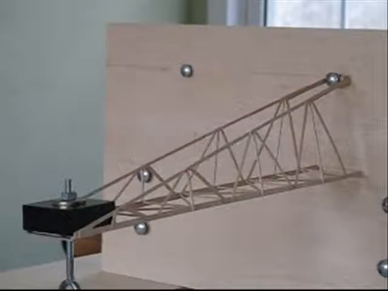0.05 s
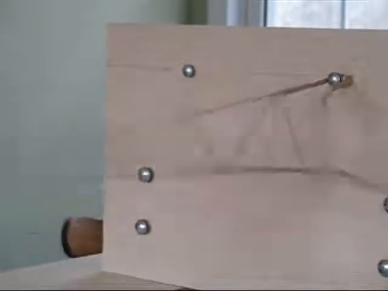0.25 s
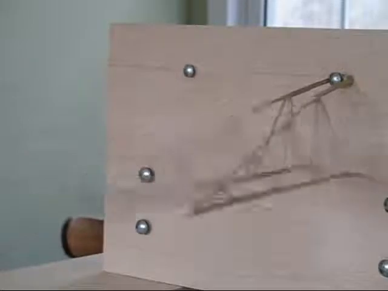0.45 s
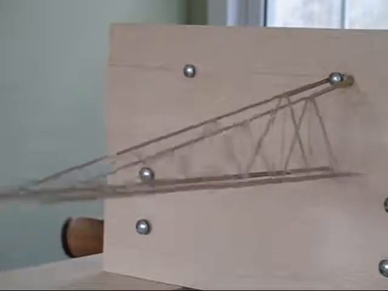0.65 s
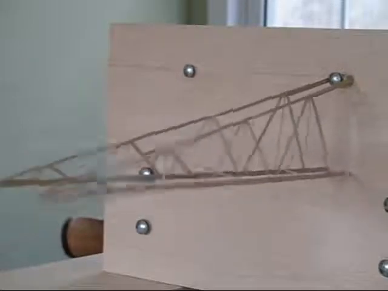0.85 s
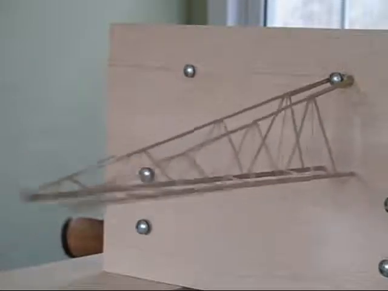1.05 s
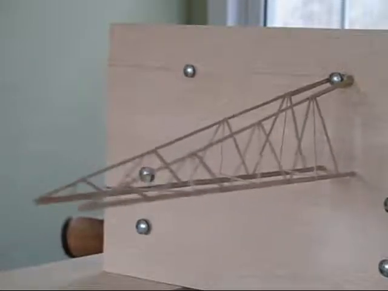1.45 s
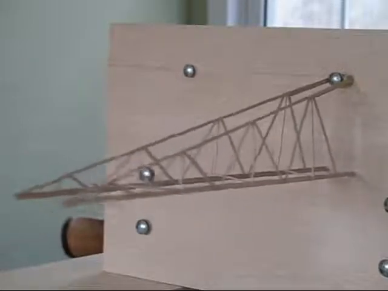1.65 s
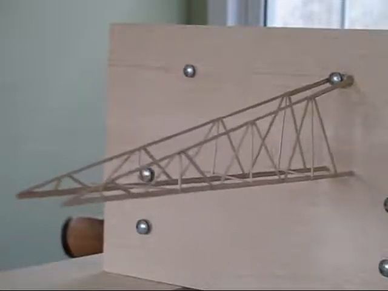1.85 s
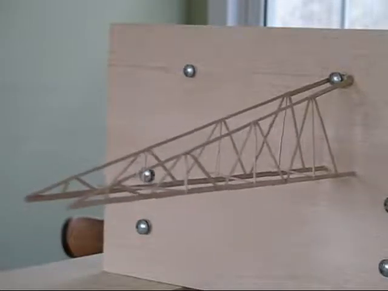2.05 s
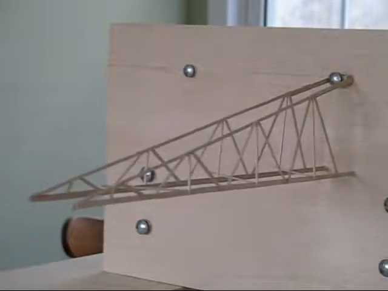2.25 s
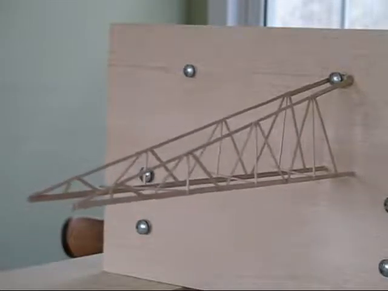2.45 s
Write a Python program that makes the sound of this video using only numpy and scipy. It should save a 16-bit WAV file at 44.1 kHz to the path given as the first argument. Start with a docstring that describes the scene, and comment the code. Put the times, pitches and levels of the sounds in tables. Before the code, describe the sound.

Dry wooden cracks and a crash, then loose sticks rattling and knocking ever more sparsely.

```python
"""A burst of dry wooden cracks: a model truss of thin sticks snaps under its load. The weight crashes down,
the table shudders and the long beam twangs. Sticks scrape, and the loose frame swings and clatters
against its backboard in ever sparser knocks, in a small room. Each hit is a chatter of tiny contacts
that rings the wood. A cheap low-rate recorder adds hiss, hum, a thin whine and a gritty mirrored treble."""
import sys
import numpy as np
from scipy import signal
from scipy.fft import rfft, irfft
from scipy.io import wavfile

SR = 44100
rng = np.random.default_rng(int(sys.argv[2]) if len(sys.argv) > 2 else 0)


def dump(signal):
    """Clip the signal to [-1, 1] and save it as 16-bit WAV at the path in sys.argv[1]."""
    limited = np.clip(np.atleast_2d(signal).T, -1, 1)
    pcm = np.round(limited * 32767).astype(np.int16)
    wavfile.write(sys.argv[1], SR, pcm)


N = 114660
BURST_GAIN = np.sqrt(.01 * SR)  # gives a unit-energy burst the energy of 10 ms at 0 dB


def undb(db):
    """Decibels to gain."""
    return 10 ** (np.asarray(db) / 20)


def unit(x):
    """Scale to an energy of one."""
    return x / np.sqrt(np.sum(x ** 2) + 1e-18)


def fade(t, t60):
    """Exponential decay, 60 dB down after t60."""
    return np.exp(-np.log(1000) * t / t60)


def band(x, edges_hz, order=2):
    """Causal band-pass."""
    return signal.sosfilt(signal.butter(order, edges_hz, "band", fs=SR, output="sos"), x)


def eq(x, points):
    """Shape the tone with a curve through (f/Hz, gain/dB) points."""
    hz, db = np.array(points, float).T
    f = np.maximum(np.fft.rfftfreq(2 * N, 1 / SR), 1)
    gain = undb(np.interp(np.log(f), np.log(hz), db))
    return irfft(rfft(x, 2 * N) * gain)[:N]


def add(out, start_s, x):
    """Mix a sound in at a time."""
    i = int(start_s * SR)
    out[i:i + len(x)] += x[:N - i]


def chatter(t, decay_s, count=120, gap_s=.0006, size=.71, scatter_db=2.5):
    """One sharp contact, then a dying rattle of rebounds at uneven gaps."""
    delays = np.cumsum(gap_s * (.5 + .5 * rng.exponential(size=count)))
    sizes = size * rng.choice([-1, 1], count) * undb(scatter_db * rng.standard_normal(count))
    samples = np.minimum(delays * SR, len(t) - 1).astype(int)
    force = np.zeros(len(t))
    force[0] = 1
    np.add.at(force, samples, sizes * np.exp(-delays / decay_s))
    return force


# Resonances of frame and board: f/Hz, level/dB, t60/s
WOOD_MODES = [(384.6, -8.5, 0.139), (725, -25.5, 0.082), (853.3, -5, 0.099), (934, -14.5, 0.142),
              (1151.8, -3, 0.133), (1211.6, -8, 0.175), (1268, -12.5, 0.168), (1555.7, 3, 0.111),
              (1660, -12.5, 0.081), (1758.7, -16, 0.344)]

def wood_ring(t, detune=.015):
    """The wood's ring after one contact; every blow lands elsewhere and detunes the modes a little."""
    hz, db, t60 = np.array(WOOD_MODES).T[:, :, None]
    tuning = 1 + detune * rng.standard_normal((len(hz), 1))
    rings = fade(t, t60) * np.cos(2 * np.pi * hz * tuning * t)
    return np.sum(undb(db) * rings / np.linalg.norm(rings, axis=1, keepdims=True), axis=0)


# Wood hits: t/s, thud level/dB, knock level/dB, snap level/dB, knock centre f/Hz, chatter decay/s
WOOD_HITS = [ (0.215, -47.5, -48, -46.5, 1090, 0.0076), (0.227, -37, -45.5, -27.5, 1100, 0.021),
             (0.2363, -22, -28.5, -16, 1345, 0.0082), (0.2461, -22.5, -21, -24.5, 879, 0.0045),
             (0.2620, -30.5, -23.5, -21, 1135, 0.0206), (0.2742, -24.5, -21.5, -31.5, 1227, 0.03),
             (0.287, -25, -19.5, -26.5, 1360, 0.0148), (0.3170, -25, -24, -27.5, 1580, 0.0126),
             (0.325, -28.5, -23.5, -22, 1280, 0.039), (0.3440, -22, -19.5, -25, 1290, 0.0053),
             (0.3610, -22.5, -22.5, -24, 1342, 0.0193), (0.3890, -30.5, -21, -24.5, 1376, 0.063),
             (0.4190, -33.5, -30, -32.5, 1345, 0.025), (0.4370, -35.5, -30, -26.5, 1260, 0.0108),
             (0.4680, -38, -29.5, -26.5, 1400, 0.018), (0.4879, -29.5, -46.5, -16.5, 1470, 0.00284),
             (0.4894, -28.5, -17.5, -17.5, 1257, 0.00544), (0.5080, -31.5, -19.5, -25.5, 1340, 0.0098),
             (0.5200, -40, -20, -23.5, 1460, 0.014), (0.5490, -36, -26, -28, 1400, 0.026),
             (0.5940, -26.5, -27, -26, 1278, 0.0148), (0.6150, -31.5, -27.5, -32, 1230, 0.0037),
             (0.641, -36, -29, -29, 1366, 0.062), (0.696, -32.5, -25, -31, 1690, 0.036),
             (0.735, -28.5, -29, -36, 1150, 0.0091), (0.7600, -33, -31, -31, 1186, 0.0139),
             (0.7900, -32, -28.5, -31, 1277, 0.0097), (0.8250, -41.5, -31.5, -33.5, 1310, 0.088),
             (0.8570, -30, -24.5, -28, 1267, 0.0192), (0.8765, -30.5, -22, -27.5, 1646, 0.0079),
             (0.8890, -52, -29, -41.5, 1436, 0.0104), (0.927, -32, -25.5, -26, 1213, 0.008),
             (0.9420, -36.5, -27.5, -32.5, 1204, 0.0036), (0.9737, -24, -14, -23.5, 1006, 0.007),
             (0.992, -29, -23, -28, 1278, 0.0037), (1.0220, -38.5, -55, -33.5, 1130, 0.0035),
             (1.0426, -30.5, -28.5, -27, 1550, 0.018), (1.0820, -36.5, -32, -34, 1225, 0.043),
             (1.1253, -38, -35.5, -34.5, 1246, 0.0057), (1.1614, -32, -38, -32.5, 1197, 0.0066),
             (1.194, -33.5, -27.5, -27, 1088, 0.0042), (1.2100, -49.5, -32.5, -27, 1320, 0.0047),
             (1.2583, -39.5, -24, -25, 1240, 0.0048), (1.2670, -41, -23.5, -34, 1296, 0.0111),
             (1.369, -37.5, -34, -43, 1136, 0.0081), (1.4656, -49, -28.5, -34, 1149, 0.00037),
             (1.6266, -49, -24, -33, 1190, 0.00025), (1.6625, -32.5, -21, -24.5, 1219, 0.012),
             (1.6760, -30.5, -27.5, -27.5, 1256, 0.005), (1.7275, -28.5, -24.5, -28, 1200, 0.00223),
             (1.7405, -51, -29, -35, 1565, 0.0046), (2.035, -37.5, -27.5, -42.5, 1206, 0.0012),
             (2.1182, -39, -30.5, -35, 1105, 0.0016), (2.1270, -52.5, -31, -39.5, 1250, 0.00256),
             (2.1510, -46.5, -32, -35, 1100, 0.0035), (2.1560, -31, -27, -43, 1070, 0.0023),
             (2.1615, -29.5, -31.5, -20.5, 1050, 0.0057), (2.1641, -25, -22, -21, 1086, 0.00192),
             (2.1950, -50, -25.5, -52, 1323, 0.0056), ]

def cracks_and_knocks(spots=3, knock_spread=1.6375, ring_db=-13):
    """Each chatter layers a low thud, a mid knock and a bright snap, and rings the wood."""
    out, t = np.zeros((spots, N)), np.arange(SR // 6) / SR  # one track per spot on the frame
    for i, (start, thud_db, knock_db, snap_db, knock_hz, chatter_s) in enumerate(WOOD_HITS):
        force = chatter(t, chatter_s)
        knock_band = (knock_hz / knock_spread, knock_hz * knock_spread)
        thud = undb(thud_db) * unit(band(force, (316.7, 599.4)))
        knock = undb(knock_db) * unit(band(force, knock_band, order=4))
        snap = undb(snap_db) * unit(band(force, (2413, 6230), order=3))
        blow = thud + knock + snap
        ring = unit(signal.fftconvolve(blow, wood_ring(t))[:len(t)])
        ring_gain = undb(ring_db) * np.linalg.norm(blow)
        add(out[i % spots], start, (blow + ring_gain * ring) * BURST_GAIN)
    return out


# Tone of the hiss: f/Hz, level/dB
HISS_EQ = [(25, -5), (50, -11), (90, -7.5), (135, 3.5), (200, 3.5), (300, 1.5), (600, 0.5), (1300, -5.5),
           (1600, -5), (2300, -9), (3400, -5), (3900, -8.5), (5400, -3.5)]

def hiss(rms_db=-43):
    """A steady bed of noise, fullest in the low mids."""
    noise = band(eq(rng.standard_normal(N), HISS_EQ), (20, 5600), order=4)
    return undb(rms_db) * noise / np.std(noise)


# Steady tones of hum and whine: f/Hz, rms level/dB
STEADY_TONES = [(59.7, -54), (119.5, -63), (312, -56.5), (1620, -56.5), (4704, -51), (4764, -55.5)]

def hum_and_whine(whine_hz=3401.4):
    """Mains hum and a thin electronic whine whose main tone swells."""
    t = np.arange(N) / SR
    swell_db = np.interp(t, [1.1, 1.45, 1.95, 2.6], [-60, -48.5, -45.5, -47])
    tones = STEADY_TONES + [(whine_hz, swell_db)]
    return sum(undb(db) * np.sqrt(2) * np.sin(2 * np.pi * (hz * t + rng.random())) for hz, db in tones)


def strike(blows, modes):
    """Each clean blow rings a body's modes as decaying sines."""
    out, t = np.zeros(N), np.arange(SR // 3) / SR
    ring = sum(undb(db) * fade(t, t60) * np.sin(2 * np.pi * hz * t) for hz, db, t60 in modes)
    for start, db in blows:
        add(out, start, undb(db) * ring)
    return out


# Impacts of the falling load: t/s, level/dB
LOAD_LANDINGS = [(0.238, -34), (0.246, -26.5), (0.287, -30)]
# Resonances of the load: f/Hz, level/dB, t60/s
LOAD_MODES = [(644.2, 2.5, 0.93), (722, 1.5, 0.33), (822, 3, 0.035), (921.5, 17.5, 0.034), (922, 2, 0.148)]

def load_crash():
    """The weight lands with a hard clank and rings on."""
    return strike(LOAD_LANDINGS, LOAD_MODES)


# Jolts through the table: t/s, level/dB
TABLE_JOLTS = [(0.24, -29), (0.42, -46), (0.487, -45), (2.164, -39)]

def table_shudder(hz=34, t60=.108):
    """Heavier blows shake the table: a short sub-bass bump."""
    out, t = np.zeros(N), np.arange(SR // 2) / SR
    for start, db in TABLE_JOLTS:
        add(out, start, undb(db) * fade(t, t60) * np.sin(2 * np.pi * hz * t))
    return out


# Blows to the long beam: t/s, level/dB
BEAM_BLOWS = [(0.268, -35), (0.592, -42.5), (0.751, -31.5), (1.193, -42.5), (1.729, -28.5), (2.17, -33.5)]

def beam_twang(hz=186.77, t60=.348, attack_s=.01):
    """The long beam sounds one low note with a soft attack."""
    out, t = np.zeros(N), np.arange(SR // 2) / SR
    envelope = (1 - np.exp(-t / attack_s)) * fade(t, t60)
    for start, db in BEAM_BLOWS:
        add(out, start, undb(db) * envelope * np.sin(2 * np.pi * hz * t))
    return out


# Splintering scrapes: t/s, level/dB, length/s
STICK_SCRAPES = [(0.698, -32, 0.0094), (0.73, -33.5, 0.0072), (0.872, -34, 0.0054), (0.927, -29.5, .005),
                 (0.938, -31, 0.011), (1.191, -26, 0.0064), (1.211, -25.5, 0.012), (1.228, -37.5, 0.0124)]

def stick_scrapes(grains_per_s=1000):
    """Sticks splinter and slide past each other in short, bright bursts of stick-slip grains."""
    out, t = np.zeros(N), np.arange(SR // 10) / SR
    for start, db, length_s in STICK_SCRAPES:
        grains = (rng.random(len(t)) < grains_per_s / SR) * rng.standard_normal(len(t))
        burst = band(grains * np.exp(-(t / length_s) ** 2), (4320, 5240))
        add(out, start, undb(db) * unit(burst) * BURST_GAIN)
    return out


# Slams into the backboard: t/s, level/dB
BOARD_SLAMS = [(0.9745, -16), (2.1635, -10.5)]
# Resonances of the board: f/Hz, level/dB, t60/s
BOARD_MODES = [(389.8, -0.5, 0.041), (466, -5, 0.0274), (543.2, 6, 0.0227)]

def board_slams():
    """The frame slams into its backboard: a hollow, well damped thump."""
    return strike(BOARD_SLAMS, BOARD_MODES)


# Square blows to the frame: t/s, level/dB
FRAME_CLACKS = [(0.976, -30), (1.260, -26.5), (1.663, -25.5), (1.680, -20.5), (1.7255, -24), (2.168, -26)]

def frame_clacks():
    """A square blow rings the whole frame with a pitched clack."""
    return strike(FRAME_CLACKS, WOOD_MODES)


# Early reflections: delay/s, level/dB
REFLECTIONS = [(.0028, -17), (.0079, -17.5), (0.0126, -16.5), (0.0146, -26.5)]
# Reverb bands: low f/Hz, high f/Hz, level/dB, t60/s
REVERB_BANDS = [(94.5, 458, -1.5, 0.496), (612.6, 2246, 3, 0.305), (2220, 6670, -2, 0.2595)]

def room(x, tail_db=0, build_s=.00204):
    """The direct sound, reflections off near surfaces, then a short diffuse tail."""
    t = np.arange(2 * SR // 3) / SR
    response = np.zeros(len(t))
    response[0] = 1
    for delay, db in REFLECTIONS:
        response[int(delay * SR)] += undb(db)
    for low, high, db, t60 in REVERB_BANDS:
        tail = unit(rng.standard_normal(len(t)) * fade(t, t60) * (1 - np.exp(-t / build_s)))
        response += undb(db + tail_db) * band(tail, (low, high), order=3)
    return signal.fftconvolve(x, response)[:N]


# Microphone colour: f/Hz, gain/dB
MIC_EQ = [(100, 5.5), (200, 0.5), (300, -11), (400, -6), (620, -4), (850, -1), (1200, -5.5), (1750, -3.5),
          (2350, -4.5), (3200, -3), (4300, -5.5), (5500, -7)]

def scene():
    """The collapse in its room, with a dry low end, over a bed of hiss, hum and whine."""
    blows = load_crash() + board_slams() + frame_clacks()
    radiated = band(blows, (283.5, 3010), order=5)
    bodies = room(radiated, tail_db=-6.5)
    clatter = sum(room(spot) for spot in cracks_and_knocks())  # each spot gets its own tail
    collapse = eq(clatter + room(stick_scrapes()) + bodies, MIC_EQ)
    return (collapse + table_shudder() + beam_twang() + hiss() + hum_and_whine())[None]


# Nearly flat output colour: f/Hz, gain/dB
OUTPUT_EQ = [(5000, 0), (7500, 0), (9500, -0.5), (13000, 0), (15000, 0)]

def record(dry, open_s=.215, headroom=.8, hold=4, top_hz=15400):
    """The lo-fi recorder opens from silence, rounds the peaks and samples at a quarter rate."""
    gate = np.arange(N) / SR >= open_s
    rounded = headroom * np.tanh(dry[0] / headroom) * gate
    low_rate = signal.resample_poly(rounded, 1, hold)
    held = np.repeat(low_rate, hold)[:N]  # holding each value mirrors the sound into the treble
    high_cut = signal.ellip(10, .2, 80, top_hz, fs=SR, output="sos")
    return signal.sosfilt(high_cut, eq(held, OUTPUT_EQ))[None]


dry = scene()
out = record(dry)
dump(out)
```